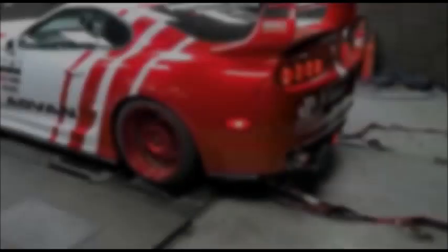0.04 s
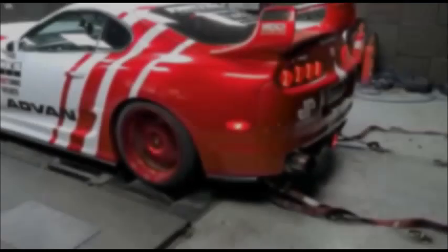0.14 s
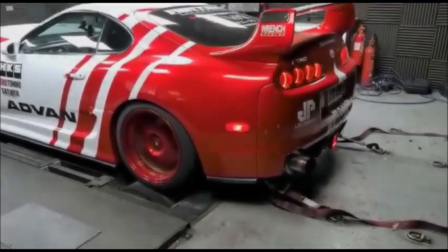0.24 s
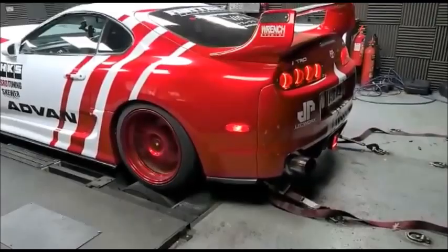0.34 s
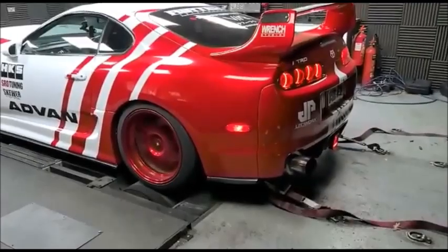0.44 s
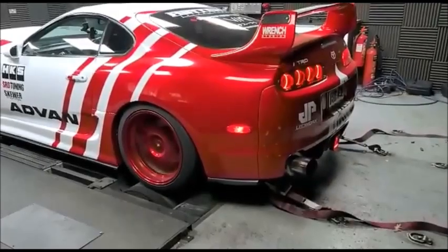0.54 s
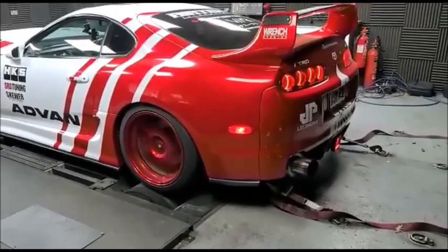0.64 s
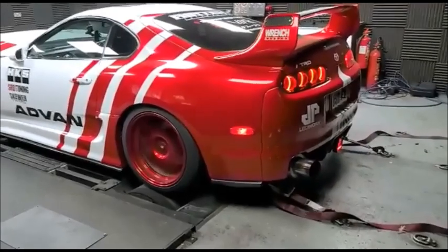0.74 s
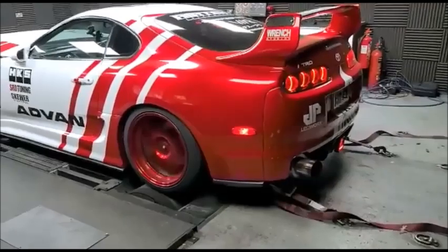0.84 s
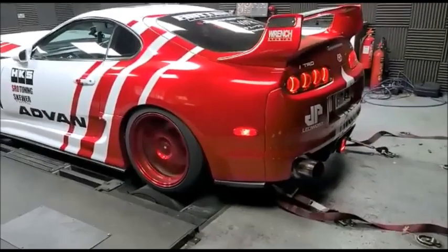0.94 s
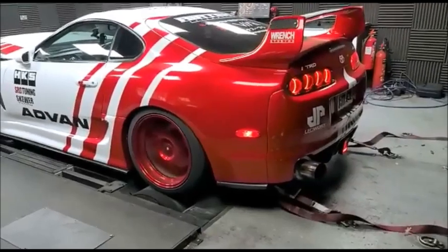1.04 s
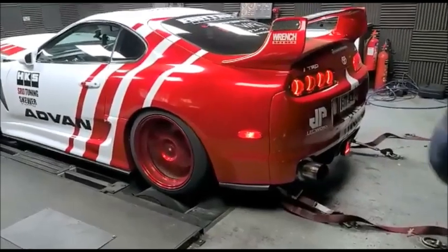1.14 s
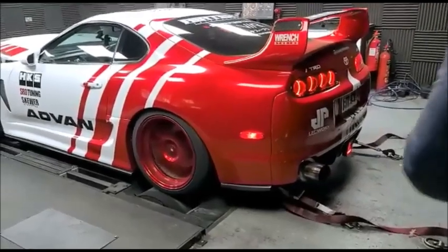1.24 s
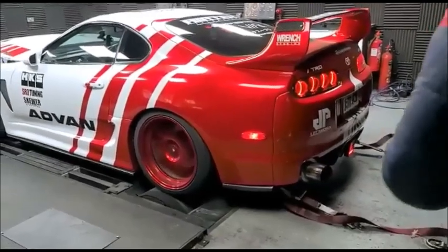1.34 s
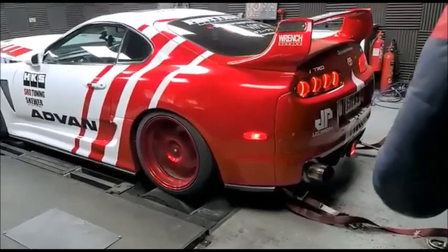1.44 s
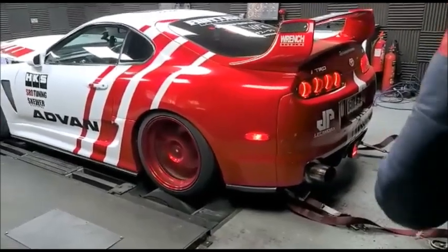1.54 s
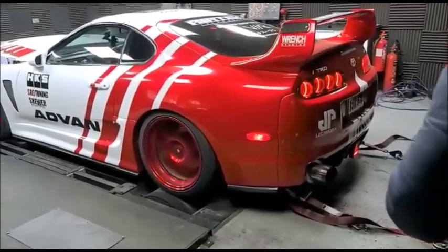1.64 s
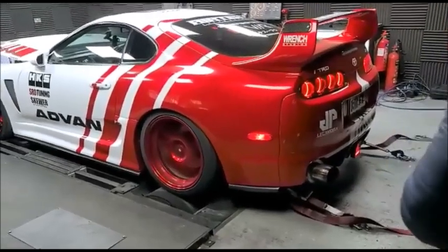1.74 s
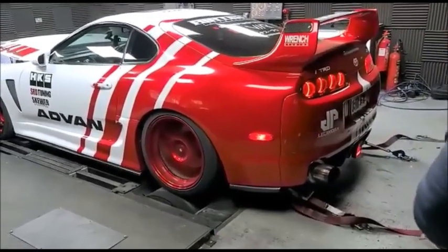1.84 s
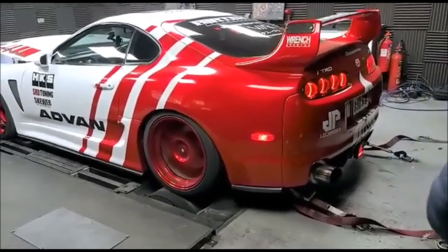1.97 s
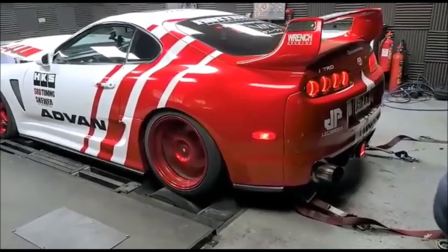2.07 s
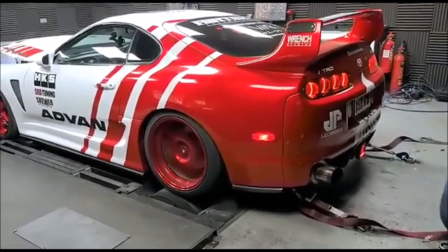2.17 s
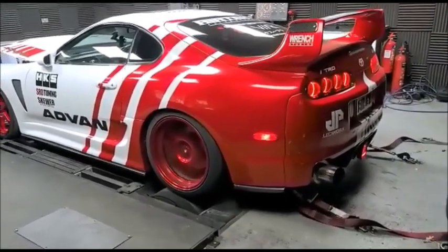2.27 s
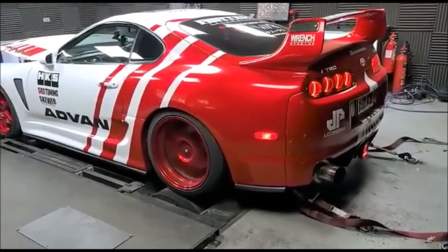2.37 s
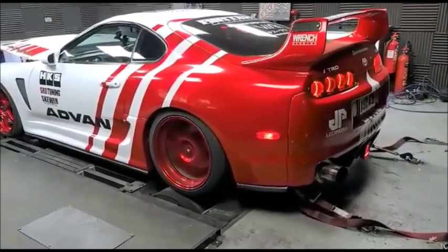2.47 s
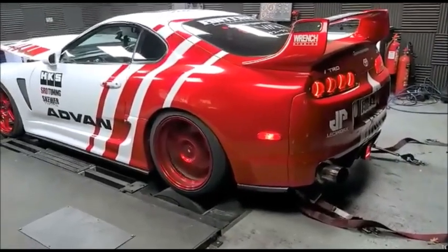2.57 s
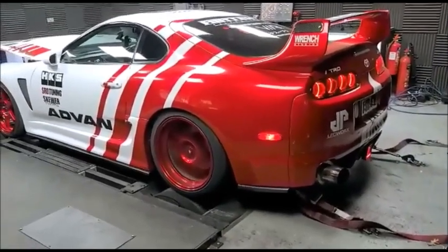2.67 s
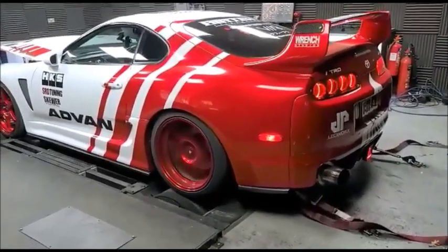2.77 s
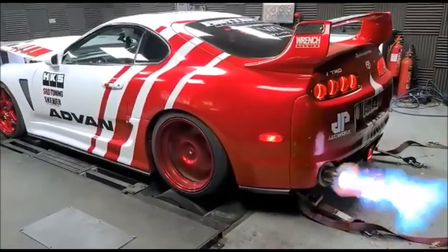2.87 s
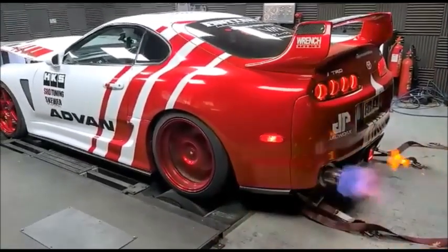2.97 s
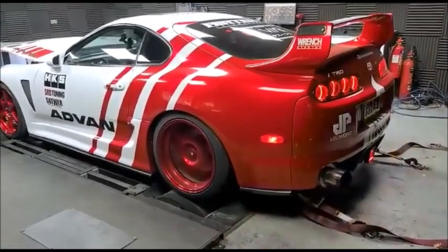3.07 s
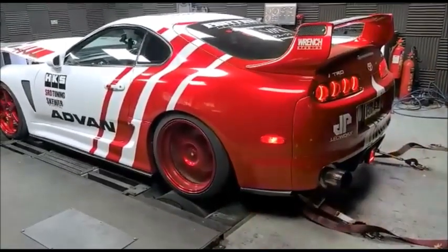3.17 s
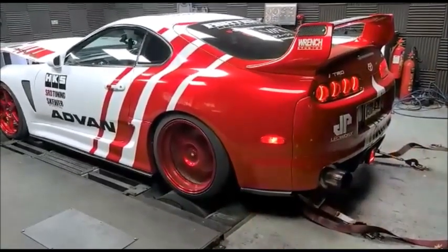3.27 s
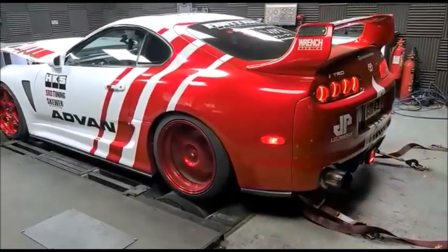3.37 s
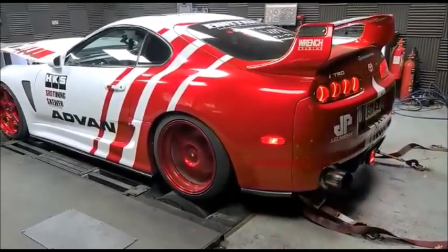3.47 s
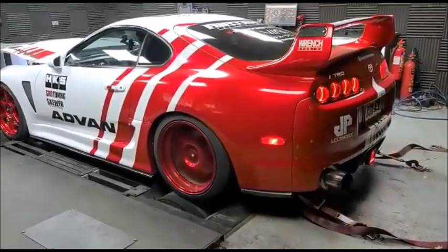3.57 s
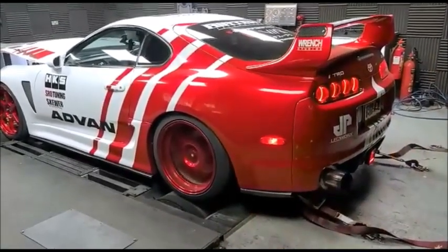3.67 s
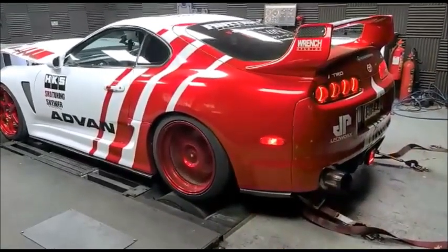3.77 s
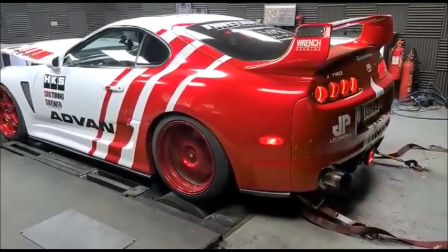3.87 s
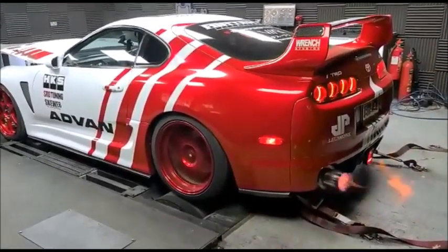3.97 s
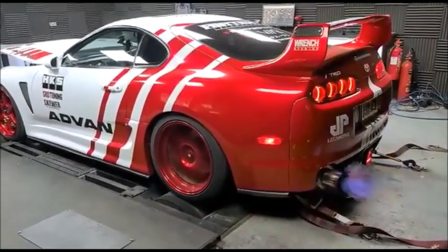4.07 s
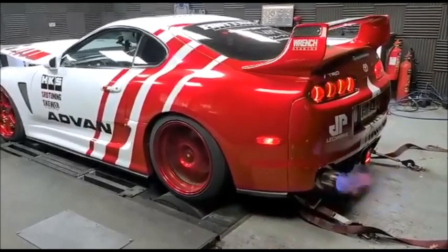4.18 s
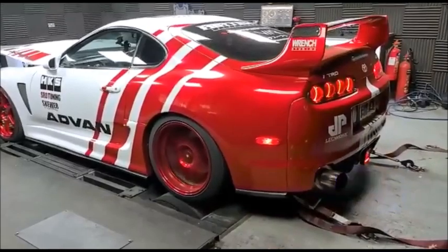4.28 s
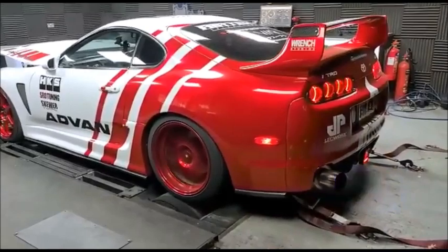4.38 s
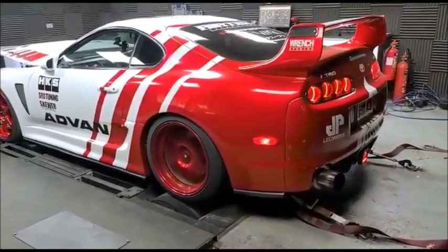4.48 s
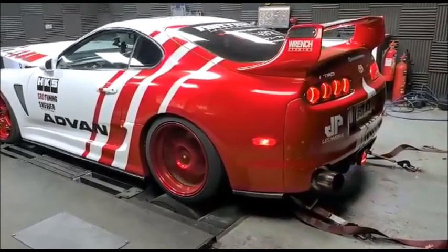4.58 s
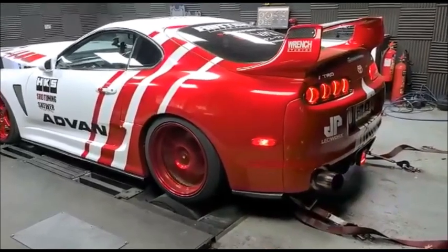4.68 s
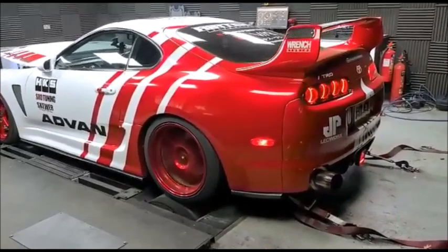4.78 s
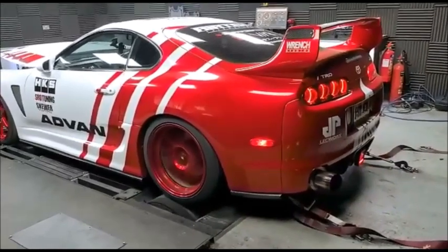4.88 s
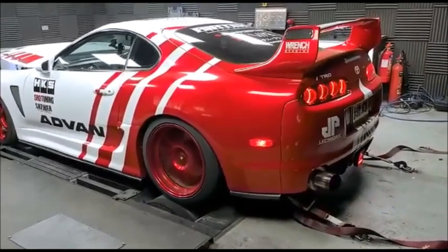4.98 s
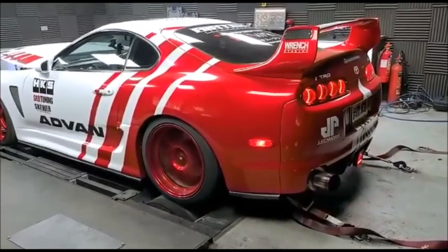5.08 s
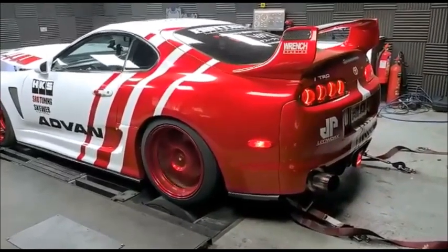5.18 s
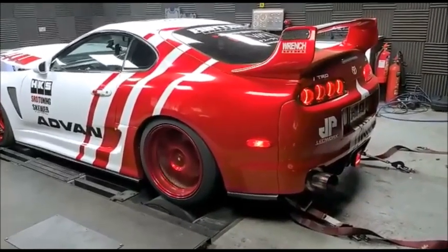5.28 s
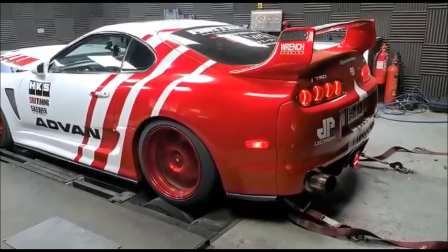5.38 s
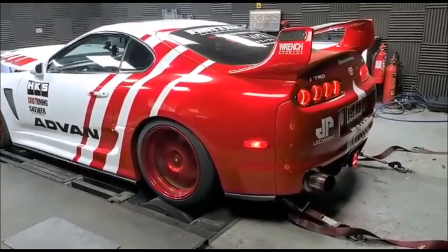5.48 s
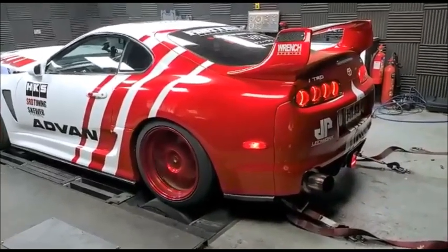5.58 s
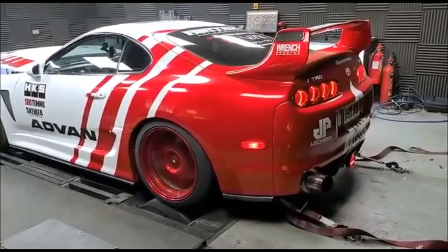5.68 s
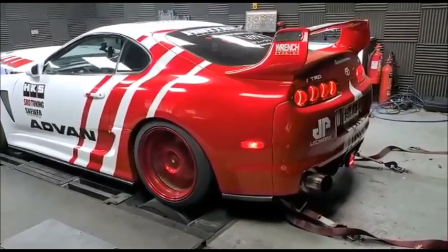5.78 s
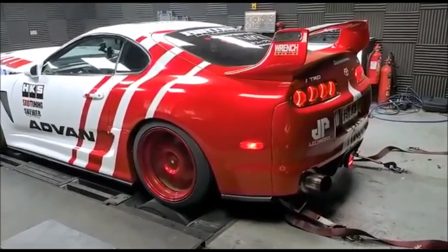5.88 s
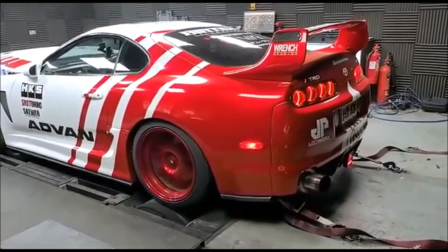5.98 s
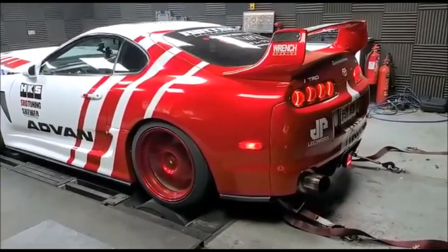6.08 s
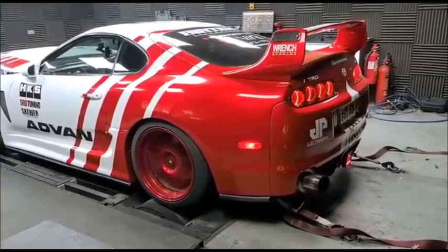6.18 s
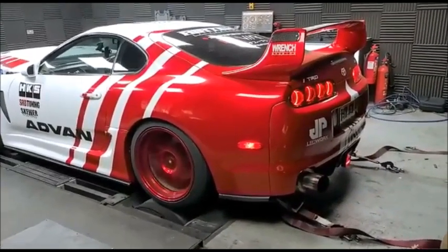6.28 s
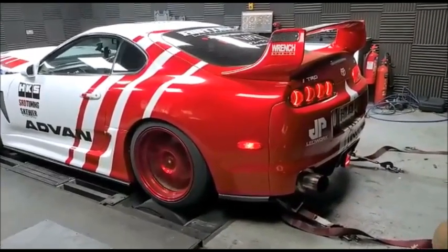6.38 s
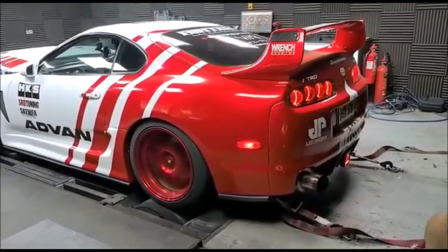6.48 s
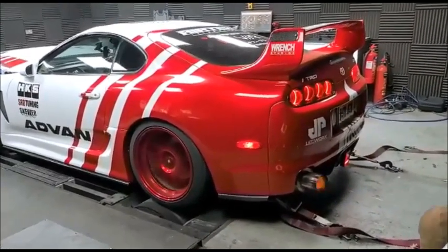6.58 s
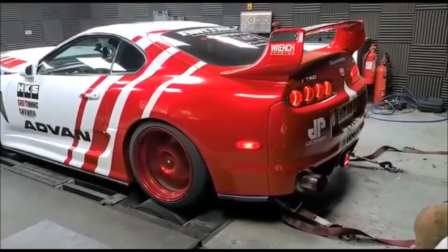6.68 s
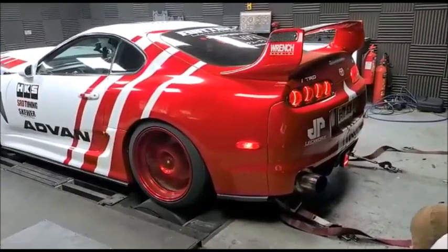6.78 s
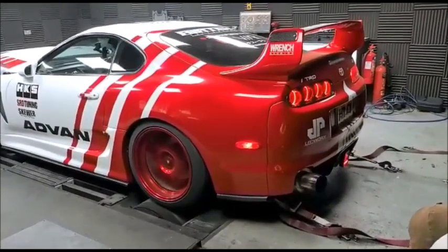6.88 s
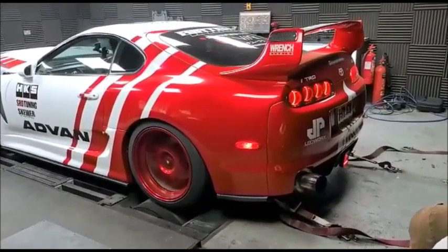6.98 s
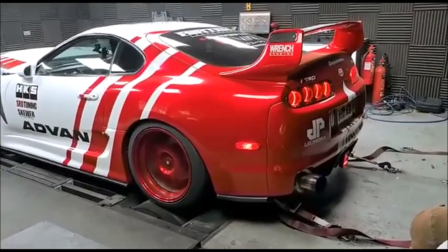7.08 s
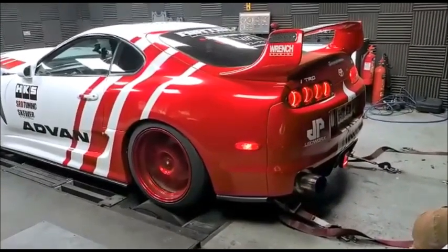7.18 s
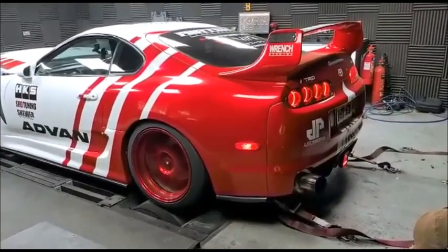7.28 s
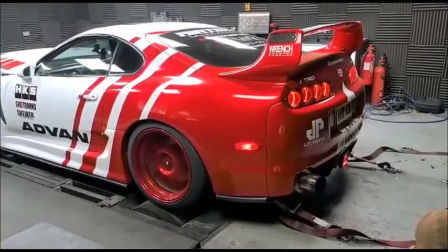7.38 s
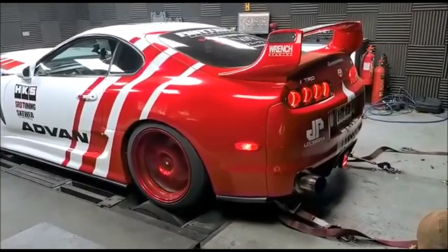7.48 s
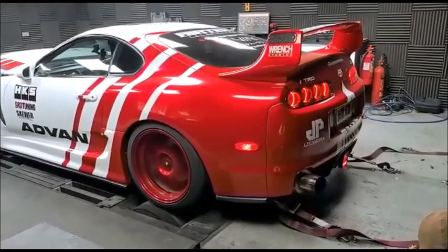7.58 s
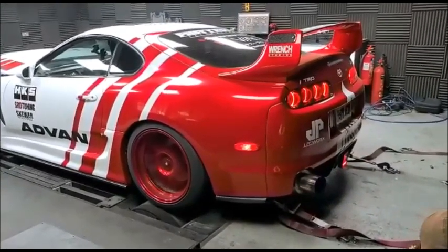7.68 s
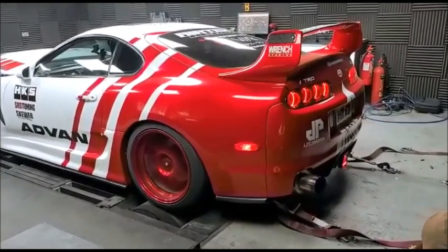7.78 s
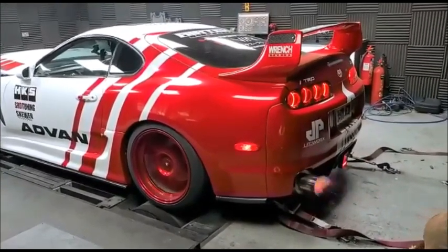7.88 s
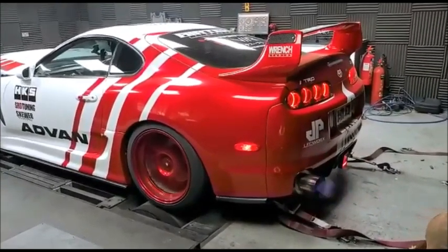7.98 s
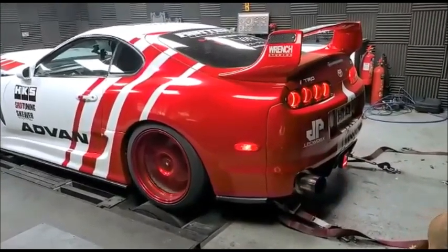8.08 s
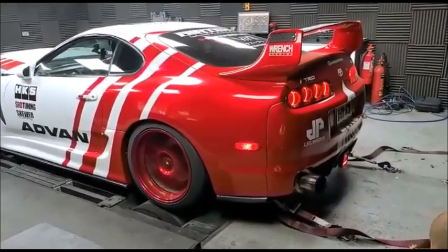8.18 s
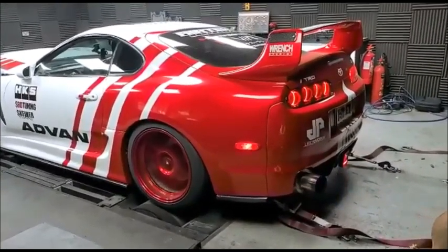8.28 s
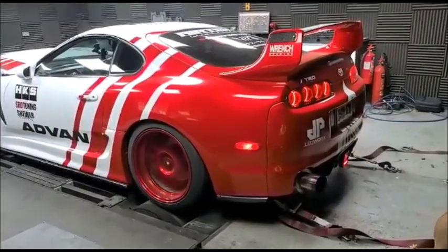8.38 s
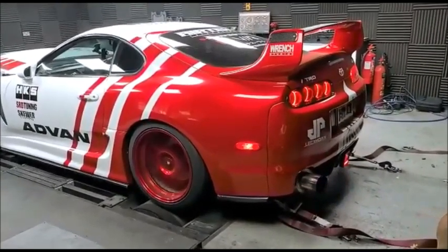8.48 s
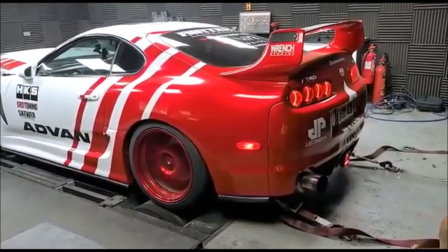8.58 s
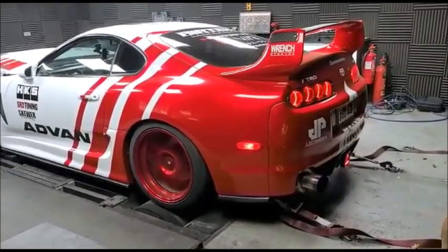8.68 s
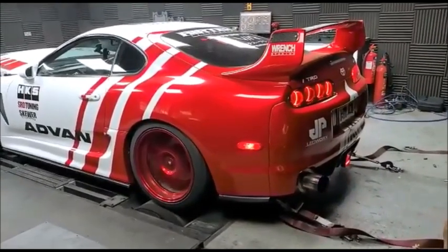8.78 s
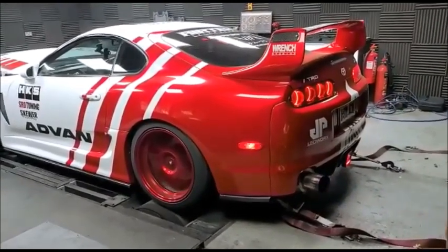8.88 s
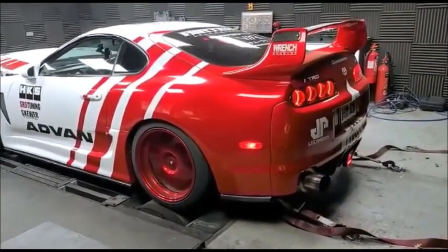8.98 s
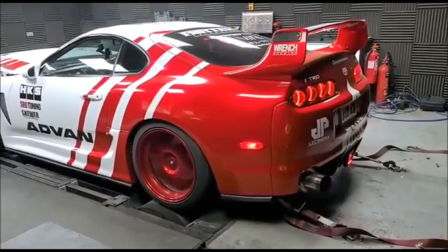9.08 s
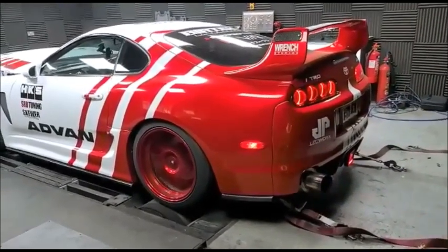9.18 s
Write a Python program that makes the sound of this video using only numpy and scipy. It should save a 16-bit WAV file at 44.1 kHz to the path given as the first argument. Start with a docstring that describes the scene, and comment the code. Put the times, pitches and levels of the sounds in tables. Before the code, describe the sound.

A stereo microphone near the rear of a car on rollers hears a deep exhaust drone rise gently, brassy and raspy, then turn softer and uneven on the overrun. Unburnt fuel stumbles and booms in the pipe, with irregular thumps, cracks and lower pops. A thin, wobbling tyre whistle glides down over gassy rush and hiss. The loudest blasts sound slightly squashed, in a tight room.

```python
"""A low exhaust drone and a ragged burble come first: a turbocharged straight six on rollers in a padded cell.
It pulls gently with a bright rasp, lifts at about 2 s and coasts down; the drone is a sum of firing harmonics.
Unburnt fuel throbs in the pipe's two low resonances and six times goes off in a rasping bang of shaped noise.
Tyres on knurled rollers hiss (noise) and whistle (partials tied to engine speed); blasts make all this sag.
Levels are as they reach the stereo microphone, which rounds the highest peaks; no distance is computed."""
import sys
import numpy as np
from scipy import signal
from scipy.fft import rfft, irfft, next_fast_len
from scipy.io import wavfile
from scipy.ndimage import uniform_filter1d

SR = 44100
rng = np.random.default_rng(int(sys.argv[2]) if len(sys.argv) > 2 else 0)


def wav_record(signal):
    """Record a signal, one row per channel, as 16-bit PCM in the file named by sys.argv[1]."""
    frames = np.transpose(np.atleast_2d(signal))
    bounded = np.clip(frames, -1, 1)
    # unit amplitude maps onto the largest positive 16-bit level
    quanta = np.round(bounded * 32767).astype(np.int16)
    wavfile.write(sys.argv[1], SR, quanta)


N = 407043
T = np.arange(N) / SR  # time [s]
LEFT_RIGHT = np.array([[1], [-1]])  # opposite signs for the two ears


def undb(db):
    """Decibels to gain."""
    return 10 ** (np.asarray(db) / 20)


def curves(rows):
    """Each column of a table as a line through time."""
    s, *columns = np.transpose(rows)
    return [np.interp(T, s, c) for c in columns]


def response(at, points):
    """Read a two-column table at a moving pitch or time."""
    return np.interp(at, *np.transpose(sorted(points)))


def unit(x):
    """Scale to rms 1."""
    return x / np.sqrt(np.mean(x ** 2))


def pan(db):
    """Channel gains for a left minus right level."""
    return undb(LEFT_RIGHT * db / 2)


def walk(rate):
    """Smooth chance of spread 1 that changes rate times a second."""
    k = max(int(SR / rate), 1)
    steps = np.repeat(rng.standard_normal(N // k + 1), k)
    return unit(uniform_filter1d(steps, k)[:N])


def turn(hz):
    """Phase in radians of a moving frequency."""
    return 2 * np.pi * np.cumsum(hz) / SR


def swell(at, rise, fall, hold=0):
    """Envelope that grows exponentially to 1, holds and dies away; times in seconds."""
    return np.exp(-np.clip(np.maximum((at - T) / rise, (T - at - hold) / fall), 0, 60))


# standing waves of pipe and cell, notches negative: (centre [Hz], width [Hz], level [dB])
STANDING_WAVES = [(280, 11, 1), (336, 17, -4), (373, 18, 4), (444.4, 29, 3.5), (487, 13, 6),
                  (521, 8.6, -19), (612, 73, 3), (676, 19, -13), (710, 33, 7.5), (736, 11, -11),
                  (792, 19, 9), (813, 14, -12), (836, 12, 7.5), (885, 30, -4), (970, 80, 3.5),
                  (1126, 24, -4)]


def pipe_db(hz):
    """Ripple that the standing waves lay on the exhaust sound."""
    grid = np.arange(2000)
    ripple = sum(db / (1 + (2 * (grid - centre) / width) ** 2) for centre, width, db in STANDING_WAVES)
    return np.interp(hz, grid, ripple)


def colour(x, points, ripple=0):
    """Causal filter with the given (Hz, dB) response, plus a share of the pipe's ripple."""
    size = 2 * next_fast_len(N // 2 + 8192)
    hz, db = np.transpose(points)
    bins = np.arange(size // 2 + 1) * SR / size + 1
    gain_db = np.interp(np.log(bins), np.log(hz), db)
    if ripple:
        gain_db = gain_db + ripple * pipe_db(bins)
    # folding the cepstrum onto positive times gives minimum phase
    cepstrum = irfft(np.log(undb(gain_db)))
    cepstrum[1:size // 2] *= 2
    cepstrum[size // 2 + 1:] = 0
    return irfft(rfft(x, size) * np.exp(rfft(cepstrum)))[..., :N]


# the cell's share in the stereo sound: (frequency [Hz], side minus mid level [dB])
CELL_WIDTH = [(60, -1.5), (250, -9), (500, -12.5), (1000, -1), (3000, 0.5), (12000, 1)]


def air(points, drive=1, ripple=0):
    """Stereo turbulence of one colour: mid noise in both ears, side noise opposed, set by the cell's width."""
    mid, side = rng.standard_normal((2, N)) * drive
    return unit(colour(mid + colour(side, CELL_WIDTH) * LEFT_RIGHT, points, ripple))


def cusped(wave, edge):
    """A strong wave sharpens into cusps at crest and trough; an edge near 1 makes spikes."""
    edge = np.clip(edge, .01, .97)
    return np.arctanh(2 * edge * wave / (1 + edge ** 2)) / (2 * edge)


# sags at blasts and flare-ups: (start [s], length [s], depth for the tones [0-1], depth for the noise [0-1])
SAGS = [(2.06, 0.18, 0.23, 0.15), (2.98, 0.13, 0.5, 1), (3.944, 0.021, 0.1, 0), (4.314, 0.12, 0.52, 0.6),
        (5.182, 0.59, 0.55, 0.69), (6.564, 0.022, 0.07, 0), (6.817, 0.21, 0.4, 0.82),
        (7.93, 0.063, 0.1, 0.3), (8.094, 0.2, 0.32, 1), (9.12, 0.071, .8, 1)]
DIP_ATTACK_S, TONES_RETURN_S = 0.0063, 0.063
# the noise holds for a share of the dip, and returns more slowly as the engine slows: (time [s], recovery [s])
NOISE_HOLD, NOISE_RETURN = 0.8, [(3, 0.16), (7, 0.48)]


def dips():
    """How far the tones and the noise have dipped; the tones come back faster."""
    tones = sum(depth * swell(s, DIP_ATTACK_S, TONES_RETURN_S, length) for s, length, depth, _ in SAGS)
    noise = sum(depth * swell(s, DIP_ATTACK_S, response(s, NOISE_RETURN), NOISE_HOLD * length)
                for s, length, _, depth in SAGS)
    return tones, noise


# throttle, as the level of overtones and rasp under power: (time [s], level [dB])
THROTTLE = [(.28, -60), (.38, -32.5), (.8, -27), (1.1, -25.5), (1.7, -26), (2.0, -24), (2.03, -56),
            (2.3, -80)]


def throttle_open():
    """1 while the engine pulls, 0 while it coasts."""
    power_db, = curves(THROTTLE)
    return np.clip(undb(power_db + 27), 0, 1)


# the drone builds as the engine takes up load: (time [s], level [dB])
DRONE_LEVEL = [(0, -10), (.28, -21), (.38, -8), (.75, -5), (1.5, 1.5), (2.1, 1), (9.23, -2)]
# how loudly the pipe sounds a firing harmonic at each pitch: (frequency [Hz], level [dB])
DRONE_PITCH_RESPONSE = [(85, -24), (91, -22), (97, -23), (103, -20), (113, -22.5), (121, -34.5), (168, -21),
                        (182, -17), (191, -14.5), (203, -22), (215, -19), (238, -23.5)]
# even firing first weakens the three-cylinder line, which grows until the lift: (time [s], level [dB])
THREE_CYLINDER_LEVEL = [(.75, -17), (1, -6.5), (1.6, 0), (2.0, 4), (2.1, 5), (6.5, -2.5), (9.23, 6.5)]
# exhaust overtones: (multiple of the three-cylinder rate, level under power [dB], level coasting [dB])
EXHAUST_OVERTONES = [(3, -9, -14.5), (4, -4.5, -15), (5, -3.5, -17.5), (6, -6.5, -18.5), (7, -11, -34),
                     (8, -14.5, -25.5), (9, -14.5, -27.5), (10, -32, -27), (11, -22, -44), (12, -30, -49),
                     (13, -24, -26), (17, -43, -28), (18, -35, -55)]


def drone(phase, rate_hz, dip):
    """Firing harmonics: clean and brassy under power, soft and uneven with the throttle shut."""
    flutter, power_rough, coast_rough = 0.12, .25, .2  # depths of uneven loudness
    three_dip_db, six_dip_db = -8, -17  # at full dip
    wander_db, sway_db = 0.46, .2  # sway is per overtone number
    opening_share, odd_share, coast_ripple = -0.13, 0.48, 1.07
    level_db, = curves(DRONE_LEVEL)
    power_db, = curves(THROTTLE)
    even_db = response(T, THREE_CYLINDER_LEVEL)
    # the lines of three and of six cylinders glide through the pipe's response
    three_db = level_db + response(rate_hz, DRONE_PITCH_RESPONSE) + three_dip_db * dip
    three_db = three_db + even_db + wander_db * walk(9.2)
    six_db = level_db + response(2 * rate_hz, DRONE_PITCH_RESPONSE) + six_dip_db * dip
    six_db = six_db + wander_db * walk(3.39)
    three = undb(three_db) * (1 + flutter * walk(35)) * np.sin(phase)
    six = undb(six_db) * (1 + flutter * walk(35)) * np.sin(2 * phase + 1)
    out = three * pan(-1.5) + six * pan(-2.3)
    coast = undb((three_db + six_db) / 2) * (1 - throttle_open())
    for k, on_db, off_db in EXHAUST_OVERTONES:
        # each overtone swells and fades as it glides through the standing waves
        standing_db = pipe_db(k * rate_hz)
        # drone level tilts the overtones; the odd ones also follow the three-cylinder line
        load_db = opening_share * (k - 4) * level_db + odd_share * (k % 2) * even_db
        on = undb(power_db + on_db + load_db + standing_db + sway_db * k * walk(9.05))
        on = on * (1 + power_rough * walk(70))
        off = coast * undb(off_db + coast_ripple * standing_db) * (1 + coast_rough * walk(20))
        # wall reflections shift the higher partials between the ears
        shift = LEFT_RIGHT * 0.048 * k * (-1) ** k
        # pipe and cell delay each overtone differently, which smears the firings
        smear = np.pi * k ** 2 / 6
        out = out + (on + off) * np.sin(k * (phase + 0.0062 * walk(25)) + shift + smear)
    return np.sqrt(2) * out


# smouldering in the pipe between flare-ups: (time [s], level [dB])
BURBLE_LEVEL = [(0, -24.5), (.15, -25), (.6, -33.5), (1.8, -34), (2.4, -26.5), (2.85, -21), (3.7, -25.5),
                (4.7, -22), (6.2, -23), (7.4, -24.5), (8.4, -20), (9.23, -21)]
# colour of the boom in the pipe: (frequency [Hz], level per Hz [dB])
BOOM_COLOUR = [(15, -27.5), (30, -7.5), (43, -13), (56, 5), (67, -9), (82, -4), (100, -5.5), (140, -16),
               (220, -33), (400, -46.5), (800, -58), (1500, -48.5), (4000, -104)]
# colour of the gas spat at burbles and flare-ups: (frequency [Hz], level per Hz [dB])
SPAT_GAS_COLOUR = [(80, -27), (200, -4.5), (400, 3), (750, 2.5), (1200, -21), (1800, -31), (4000, -53)]


def burble(rate_hz=76, scatter=.19, size_db=2.0, sputter_db=3.0, edge=0.73, spit_db=-15.5):
    """Fuel smoulders in the hot pipe in a ragged train of pulses that boom in its two low resonances."""
    smoulder_db, = curves(BURBLE_LEVEL)
    chance = rng.standard_normal((1000, 2))
    gaps = np.exp(scatter * chance[:, 0])
    at = (np.cumsum(gaps) * SR / rate_hz).astype(int)
    pulses = np.bincount(at, undb(size_db * chance[:, 1]), N)[:N]
    boom = unit(colour(pulses - pulses.mean(), BOOM_COLOUR))
    boom = signal.hilbert(boom, next_fast_len(N))[:N]
    # the boom is evened to a near-steady strength, so the smouldering level alone sets how loud it is
    boom = boom / np.sqrt(uniform_filter1d(abs(boom) ** 2, size=700) / 2 + 0.005)
    wave = np.cos(np.angle(boom))
    spit = air(SPAT_GAS_COLOUR, wave ** 2, ripple=0.35) * undb(spit_db)
    throb = abs(boom) * cusped(wave, edge) * pan(-1.3)
    return (throb + spit) * undb(smoulder_db + sputter_db * walk(20))


# gas flow from the tailpipe: (time [s], level [dB])
RUSH_LEVEL = [(0, -34), (.4, -32), (1, -28.5), (2.1, -28.5), (2.8, -23), (3.4, -24), (4, -19.5),
              (4.5, -21.5), (6.6, -21), (7.2, -21.5), (7.85, -19), (9.23, -19.5)]
# colour of the rush: (frequency [Hz], level per Hz [dB])
RUSH_COLOUR = [(60, -40), (145, 0), (205, 6.5), (275, -3), (370, 3.5), (500, -5), (680, -2), (860, -12),
               (1100, -9), (1600, -20.5), (3000, -27.5), (8000, -65)]
# colour of the rasp under power: (frequency [Hz], level per Hz [dB])
POWER_RASP_COLOUR = [(500, -34), (1100, -34), (2100, -16), (2800, -19), (4000, 17), (5200, 13), (7000, 10),
                     (9000, 5.5), (13000, 3)]


def gas(phase, dip, lumpy_db=0.96, rasp_db=-21.0, dip_db=-3.5):
    """Gas rushes from the tailpipe in uneven puffs; under power every firing adds a bright rasp."""
    depth, rasp_depth = .45, .7
    rush_db, = curves(RUSH_LEVEL)
    power_db, = curves(THROTTLE)
    puffs = (1 + depth * np.cos(phase + .5 * walk(60))) * undb(lumpy_db * walk(140))
    rush = air(RUSH_COLOUR, puffs, ripple=0.4) * undb(rush_db + dip_db * dip)
    rasp = air(POWER_RASP_COLOUR, 1 + rasp_depth * np.cos(2 * phase)) * undb(power_db + rasp_db)
    return rush + rasp


# tyres on the rollers: (time [s], level [dB])
TYRE_LEVEL = [(0, -52.5), (.7, -43), (1.35, -38), (1.9, -35.5), (2.9, -31.5), (4, -31.5), (6.6, -32.5),
              (9.23, -30.5)]
# colour of the tyre hiss: (frequency [Hz], level per Hz [dB])
TYRE_COLOUR = [(500, -50), (1200, 5.5), (2200, 2.5), (3100, -1.5), (3900, 4), (5200, -4.5), (6500, 6.5),
               (7400, 1), (8500, -10.5), (10000, -3.5), (12500, -8), (14000, -64)]
# how loudly a partial of the whistle sounds at each pitch: (frequency [Hz], level over the hiss [dB])
WHISTLE_PITCH_RESPONSE = [(2750, -13), (2830, -10), (2900, -15.5), (3090, -13), (3220, -8.5), (3330, -14),
                          (3400, -9), (3470, -14), (3540, -6), (3610, -8), (3660, -5), (3725, -9.5),
                          (3755, -2.5), (3790, -4), (3830, -11), (3950, -1), (5480, -10), (5590, -14),
                          (5700, -12), (6050, -3.5), (6400, 3.5), (6580, 3.5), (6720, 7), (6880, 2.5),
                          (7000, -1), (7240, 2.5), (7480, -9.5), (7700, -4.5), (7860, -3.5), (8050, -4),
                          (8400, -24.5), (9700, -5.5), (9950, -8.5), (10400, -11.5), (10800, -7.5),
                          (11200, -9.5), (11800, -8), (12900, 2), (13300, -29)]


def rollers(hz, slip, tone_dip, noise_dip):
    """Tread meets knurling: hiss, and a whistle that throbs and wobbles with the wheel; slip weakens it."""
    hiss_dip_db, whistle_dip_db, slipping_db = -7, -19, -9  # at full dip or slip
    wander_db, throb_db, fourth_db = 1.6, 1.8, -14.5
    waver, skirt = .3, .12  # slow and fast unsteadiness, which widen each partial
    wobble, wheel_share = .0018, .0041  # shares of the whistle's pitch
    ear_lag = 1.8  # phase lead of the right channel [rad]
    level_db, = curves(TYRE_LEVEL)
    whistle_db = level_db + whistle_dip_db * tone_dip + slipping_db * slip / slip.max()
    wheel = turn(hz * wheel_share) + 1.0 * walk(12)
    phase = turn(hz * (1 + wobble * (np.sin(wheel) + walk(40))))
    whistle = 0
    for k in range(1, 5):
        db = whistle_db + response(k * hz, WHISTLE_PITCH_RESPONSE) + wander_db * walk(9) + fourth_db * (k == 4)
        ears = []
        for _ in range(2):
            slow = waver * (walk(45) + 1j * walk(45))
            fast = skirt * (walk(220) + 1j * walk(220))
            ears.append(undb(throb_db * np.sin(wheel + k)) * (1 + slow + fast))
        carrier = np.exp(1j * (k * phase + np.array([[0], [ear_lag]])))
        whistle = whistle + undb(db) * unit(np.real(np.array(ears) * carrier))
    hiss = air(TYRE_COLOUR, undb(1.62 * walk(200))) * undb(level_db + hiss_dip_db * noise_dip)
    return whistle * pan(-5.5) + hiss * pan(-3.5)


# flare-ups of unburnt fuel:
# (start [s], length [s], lower resonance level [dB], upper resonance level [dB], edge [0-1])
FLARE_UPS = [(0.223, 0.12, -39, -24, .6), (2.048, .2, -26, -17.5, .65), (2.973, 0.082, -13, -27.5, .95),
             (3.099, 0.063, -16.5, -17, 0.8), (3.962, 0.071, -22, -15, .8),
             (4.174, 0.16, -19.5, -16.5, 0.96), (4.326, 0.1, -12.5, -22, 0.73),
             (5.212, 0.24, -13.5, -17, 0.84), (5.464, 0.059, -25, -11, 0.66),
             (5.571, .025, -19, -13.5, 0.7), (5.64, 0.14, -18.5, -15, 0.78), (6.582, 0.064, -26, -16, 0.4),
             (6.747, 0.073, -13.5, -15, 0.6), (6.872, 0.13, -19, -17.5, .7), (7.907, .069, -22, -17, 0.8),
             (8.138, 0.089, -17.5, -18, .84), (9.145, .1, -19, -18, .73)]
FLARE_ATTACK_S, FLARE_RELEASE_S = 0.002, 0.025


def flares(low_hz=56.0, high_hz=82, jitter_s=0.000935, uneven_db=1.9, spit_db=-18):
    """A flame drives both low pipe resonances; they beat into a stumbling throb that spits gas at every cusp."""
    low, high = (np.exp(2j * np.pi * hz * (T + jitter_s * walk(35))) for hz in (low_hz, high_hz))
    throb, cusps = 0, 0
    for s, length, low_db, high_db, edge in FLARE_UPS:
        lit = min(int(s * SR), N - 1)  # both start at a crest as the fuel lights
        boom = undb(low_db) * low / low[lit] + undb(high_db) * high / high[lit]
        strength = abs(boom) * swell(s, FLARE_ATTACK_S, FLARE_RELEASE_S, length)
        wave = boom.real / abs(boom)
        throb = throb + strength * cusped(wave, edge)
        cusps = cusps + strength * 2 * (wave * wave) ** 3
    spit = cusps * air(SPAT_GAS_COLOUR, ripple=0.62) * undb(spit_db)
    return (np.sqrt(2) * throb * pan(-1.1) + spit) * undb(uneven_db * walk(60))


LIFT_S = 2.06


def blow_off(hz=3700, db=-30):
    """The boost valve chirps once as the throttle shuts: a tone roughened by fast random modulation."""
    rough = 1 + 1.1 * (walk(220) + 1j * walk(330))
    chirp = np.real(rough * np.exp(1j * turn(np.full(N, hz))))
    return unit(chirp) * undb(db) * swell(LIFT_S, 0.025, 0.012)


# cracks of the flame fronts: (time of the peak [s], level [dB], decay [s])
FLAME_CRACKS = [(3.08, -8, 0.0024), (4.311, -7, 0.0027), (5.178, -8.5, 0.0097), (5.196, -16, .006),
                (5.222, -27, .008), (6.839, -12, 0.018), (8.088, -12.5, 0.0054), (8.1, -17, 0.018),
                (9.106, -9.5, 0.013), (9.131, -15.5, 0.015), (9.158, -27, 0.0044)]
# pops of burning gas, after a crack or alone: (time [s], level [dB], decay [s])
GAS_POPS = [(2.963, -17.5, 0.0047), (3.079, -12, .005), (3.095, -12.5, 0.0096), (4.314, -10, 0.0026),
            (4.324, -18, .004), (4.33, -16, 0.0074), (4.364, -25, 0.0098), (5.172, -11, .014),
            (5.194, -8, .008), (5.206, -14, .014), (5.23, -12, 0.0099), (5.259, -22, 0.0046),
            (5.28, -18, 0.0049), (5.298, -26, 0.015), (5.372, -19.5, 0.014), (5.54, -17, 0.015),
            (6.838, -15, .008), (6.85, -9.5, 0.023), (6.889, -16, 0.03), (7.907, -19, .015),
            (8.086, -14, .006), (8.093, -12, 0.0027), (8.103, -11.5, 0.023), (8.142, -16.5, 0.025),
            (9.111, -10, 0.0081), (9.126, -10, 0.021), (9.16, -10.5, 0.022), (9.213, -17, .02)]
# colour of the cracks: (frequency [Hz], level per Hz [dB])
FLAME_CRACK_COLOUR = [(100, -9), (300, 10), (1000, 14), (2200, 7.5), (3200, 2), (4200, 4.5), (5300, 6),
                      (7000, 9), (9000, 2.5), (12500, 3.5), (14000, 8.5)]
# colour of the pops: (frequency [Hz], level per Hz [dB])
POP_COLOUR = [(30, -40), (90, 6), (200, 2.5), (350, 2.5), (700, 0), (900, -7), (1100, -3), (1800, -17),
              (4000, -22.5), (9000, -51)]
CRACK_SWELL_S, POP_SWELL_S, POP_HOLD_S = 0.0089, 0.004, 0.0025  # the crack's is its longest rise


def bangs(crackle_db=2.4, ragged_db=-0.5):
    """A flame front tears out of the pipe with a crack; burning gas adds separate, lower pops."""
    crack = sum(undb(db) * swell(s, min(decay, CRACK_SWELL_S), decay) for s, db, decay in FLAME_CRACKS)
    # unrelated gusts of gas add in power
    power = sum((undb(db) * swell(s, POP_SWELL_S, decay, POP_HOLD_S)) ** 2 for s, db, decay in GAS_POPS)
    cracks = crack * air(FLAME_CRACK_COLOUR, undb(crackle_db * walk(500))) * pan(-4.7)
    pops = np.sqrt(power) * air(POP_COLOUR, undb(ragged_db * walk(150)), ripple=0.99)
    return cracks + pops


# single hard thumps in the pipe: (time [s], peak level [dB])
PIPE_THUMPS = [(2.9695, -0.5), (4.016, -4), (4.174, -8), (5.278, -2), (6.737, 1), (7.906, -4), (7.925, 2),
               (7.962, -6), (8.018, 2)]


def thumps(width_s=0.0016, return_s=0.0081, echo=0.78):
    """A steep pressure spike leaves the pipe; suction follows when the wave has run back along it."""
    out = 0
    for s, db in PIPE_THUMPS:
        spike = swell(s, width_s / 2, width_s)
        suction = echo * swell(s + return_s, width_s, width_s)
        out = out + undb(db) * (spike - suction)
    return out


# speed of the rollers, up under power and slowly down again: (time [s], pitch of their whistle [Hz])
ROLLER_PITCH = [(0, 3319), (.55, 3262), (.8, 3277), (1, 3317), (1.25, 3430), (1.5, 3559), (2.04, 3930),
                (2.85, 3771), (3.75, 3605), (4.2, 3514), (4.7, 3420), (5.1, 3353), (5.9, 3226), (6.7, 3098),
                (7.2, 3010), (8.3, 2849), (8.7, 2778), (9.23, 2708)]
# under power the tyres slip and the engine runs ahead of the rollers: (time [s], share of the speed)
TYRE_SLIP = [(.3, 0), (.55, .019), (1.25, .032), (1.75, .045), (2.01, .058), (2.07, 0)]
WHISTLE_PER_FIRING = 32.72  # whistle pitch over three-cylinder rate, without slip


def scene():
    """Engine and rollers turn together in the cell; the crank speed wanders a little."""
    roller_hz, = curves(ROLLER_PITCH)
    slip, = curves(TYRE_SLIP)
    engine_hz = roller_hz / WHISTLE_PER_FIRING * (1 + slip)
    phase = turn(engine_hz * (1 + 0.002463 * walk(30)))
    tone_dip, noise_dip = dips()
    exhaust = drone(phase, engine_hz, tone_dip) + burble() + gas(phase, noise_dip)
    exhaust = exhaust + flares() + bangs() + thumps()
    return exhaust + rollers(roller_hz, slip, tone_dip, noise_dip) + blow_off()


TOP_HZ = 13200


def record(dry):
    """The microphone rounds the highest peaks and the top is cut."""
    rounded = dry / (1 + (dry / .9) ** 6) ** (1 / 6)
    return signal.sosfilt(signal.ellip(10, .2, 80, TOP_HZ, fs=SR, output="sos"), rounded)


dry = scene()
out = record(dry)
wav_record(out)
```